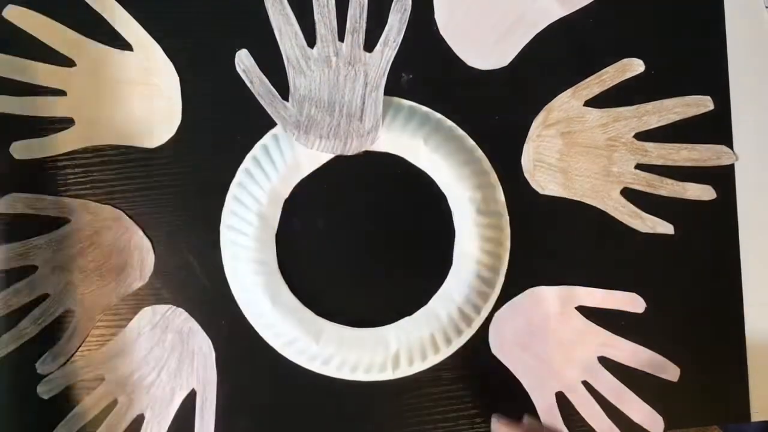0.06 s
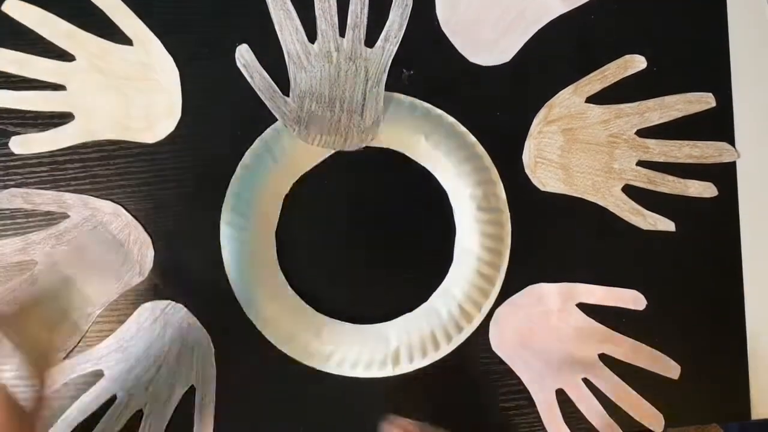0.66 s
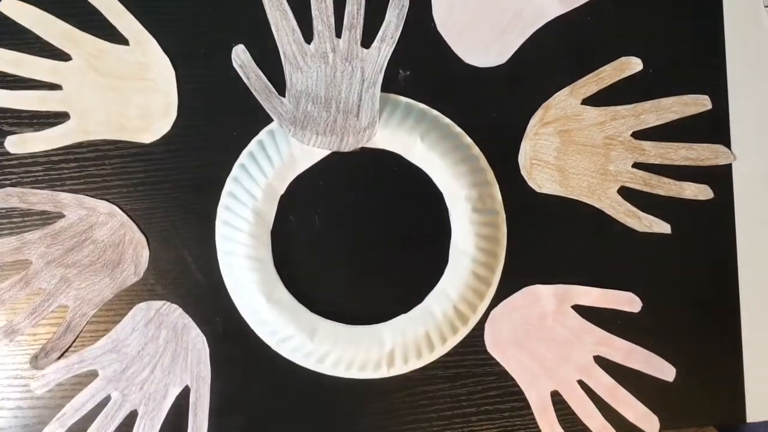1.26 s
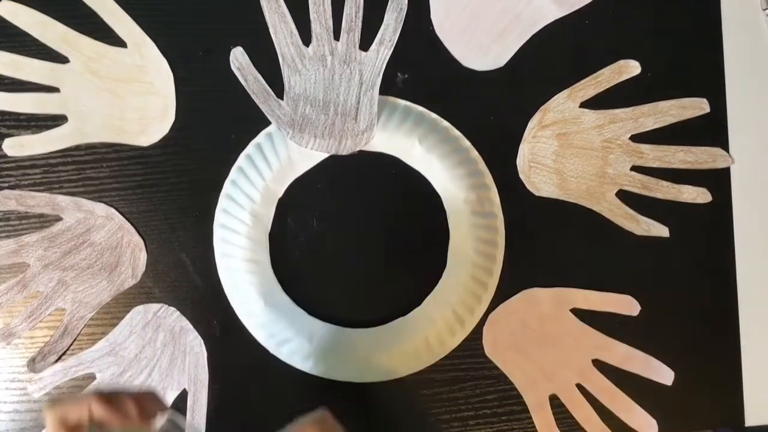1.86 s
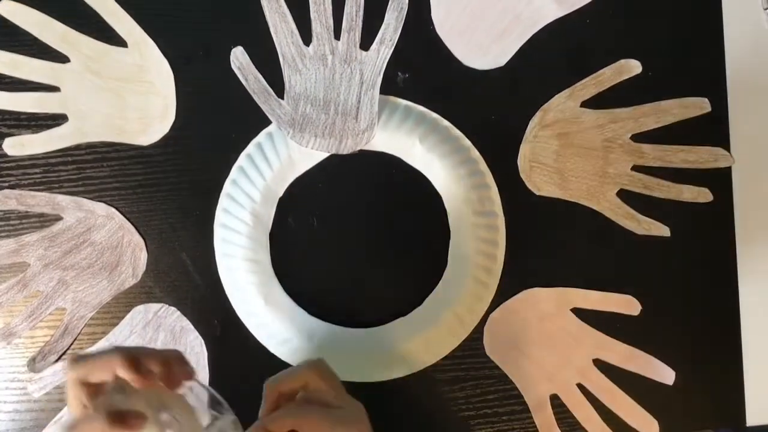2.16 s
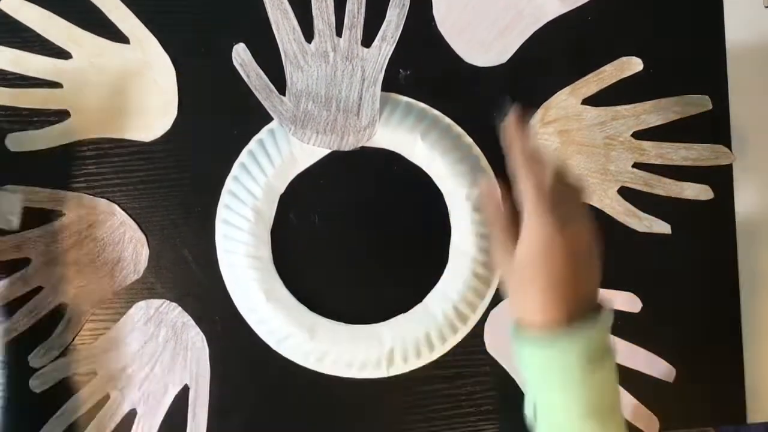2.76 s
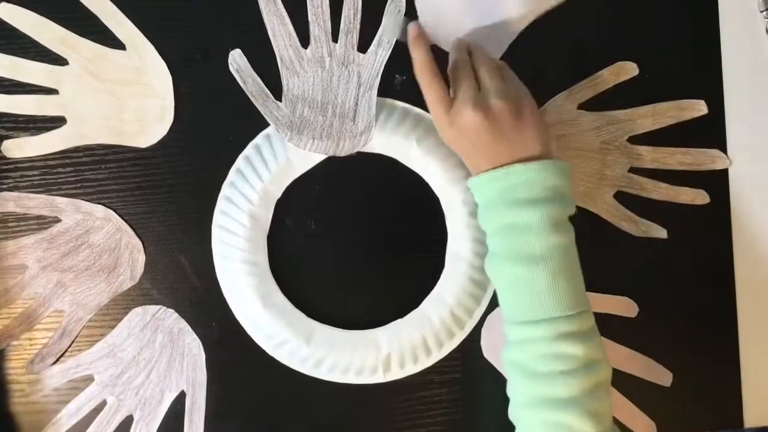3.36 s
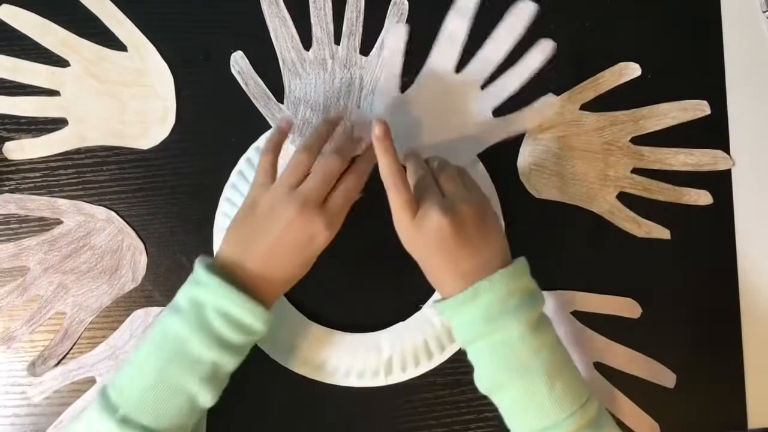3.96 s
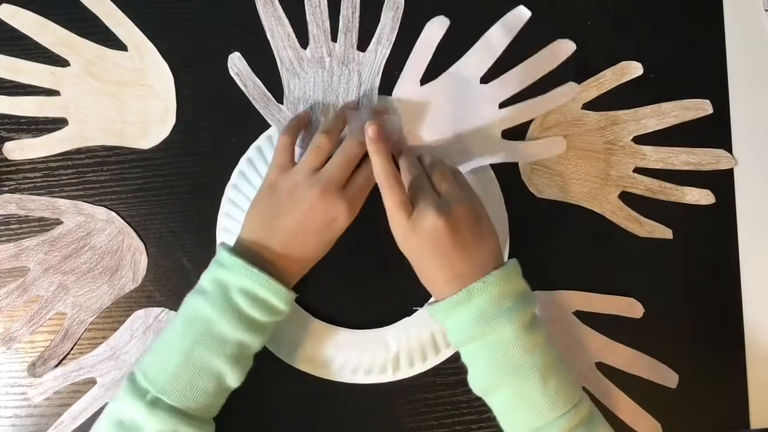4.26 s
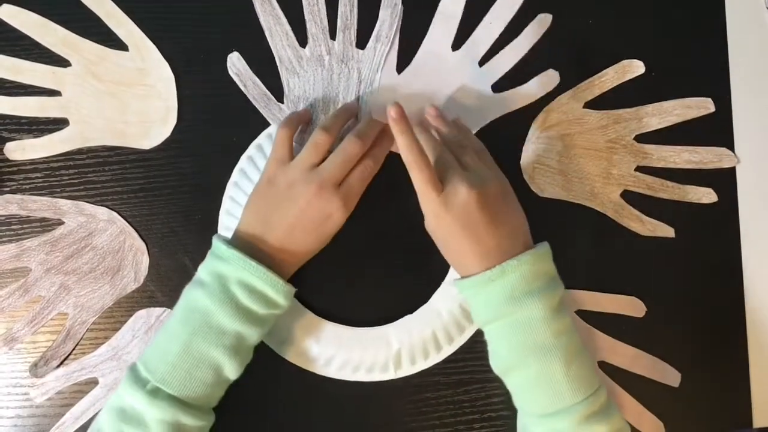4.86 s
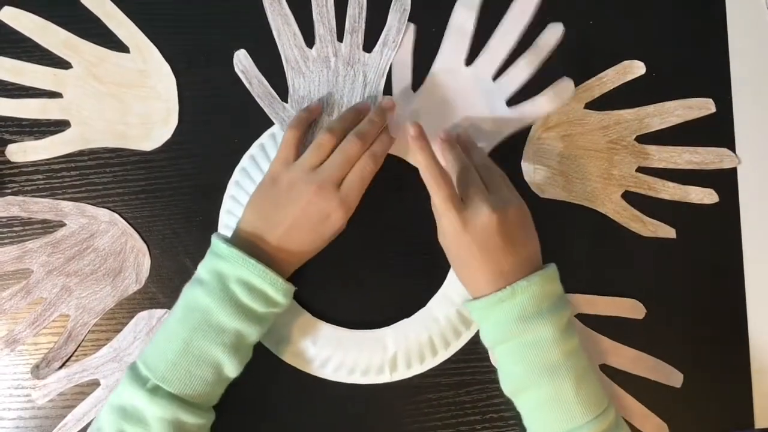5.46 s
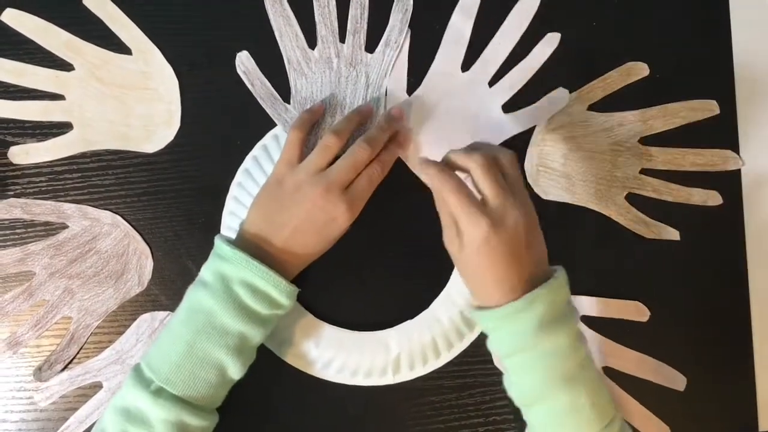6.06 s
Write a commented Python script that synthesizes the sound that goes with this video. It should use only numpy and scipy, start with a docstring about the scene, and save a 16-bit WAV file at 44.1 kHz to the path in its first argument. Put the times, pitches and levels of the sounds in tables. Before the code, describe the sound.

Paper crafting is heard from just above a wooden table in a small quiet room, over a faint rumble and hiss. From about 0.2 seconds, fingers click lightly on a plastic tape dispenser and tape peels in brief, fine crackles. Two quick snaps come at 1.3 seconds, and a sharper, louder one at 2.1 seconds as tape breaks off, followed by more small plastic clicks. From 2.7 to 3.1 seconds the dispenser knocks down on the wood and drags with a low judder, ending in another knock. At 3.2 seconds a paper cutout slides with a whisper onto a paper plate. From 3.7 seconds until about 6, fingers rub the tape flat in short, soft, hissing strokes, with paper edges flicking the plate, most clearly near 3.9, 4.5 and 5.9 seconds.

```python
"""Paper crafting on a wooden table in a small quiet room, heard from just above. Over a faint rumble and hiss,
fingers click on a plastic tape dispenser; tape peels with a fine crackle and snaps off on the teeth. From 2.7 s
the dispenser is knocked down and dragged, juddering on the wood. At 3.2 s a paper cutout slides over the table,
its fibres catching and slipping. From 3.7 s fingers rub the tape flat, and paper edges flick a paper plate."""
import sys
import numpy as np
from scipy import signal
from scipy.fft import rfft, irfft
from scipy.io import wavfile
from scipy.ndimage import uniform_filter1d

SR = 44100
rng = np.random.default_rng(int(sys.argv[2]) if len(sys.argv) > 2 else 0)


def output_pcm(signal):
    """Save a mono or channel-first signal as 16-bit PCM at the path in sys.argv[1].

    Samples are clipped to [-1, 1] before scaling.
    """
    pcm = np.clip(np.atleast_2d(signal).T, -1, 1) * 32767
    wavfile.write(sys.argv[1], SR, np.round(pcm).astype(np.int16))


N = 269892
TIME = np.arange(N) / SR


def amp(db):
    """Decibels to gain."""
    return 10 ** (np.asarray(db) / 20)


def unit(x):
    """Scale to rms 1."""
    return x / np.sqrt(np.mean(x ** 2))


def band(x, edges_hz):
    """Causal band-pass."""
    return signal.sosfilt(signal.butter(4, edges_hz, "bandpass", fs=SR, output="sos"), x)


def colour(x, spectrum):
    """Filter by a curve of (freq_hz, gain_db) points."""
    hz, db = np.transpose(spectrum)
    bins_hz = np.maximum(np.fft.rfftfreq(len(x), 1 / SR), 1)
    return irfft(rfft(x) * amp(np.interp(np.log(bins_hz), np.log(hz), db)), len(x))


def resonate(x, modes):
    """Parallel resonances, each (freq_hz, width_hz, gain_db)."""
    return sum(amp(db) * signal.lfilter(*signal.iirpeak(hz, hz / width_hz, SR), x)
               for hz, width_hz, db in modes)


def fade(t, t60_s):
    """Exponential decay, 60 dB in t60_s."""
    return np.exp(-np.log(1000) * t / t60_s)


def walk(rate_hz):
    """Smooth random wander, rms 1."""
    knots = rng.standard_normal(4096)
    return unit(np.interp(TIME * rate_hz, np.arange(len(knots)), knots))


def follow(curve):
    """Gain along (time_s, level_db) points, easing to silence outside them."""
    times_s, db = np.transpose(curve)
    gain = amp(np.interp(TIME, times_s, db)) * (TIME >= times_s[0]) * (TIME <= times_s[-1])
    return uniform_filter1d(gain, size=256)


def add(out, start_s, sound):
    """Mix a sound in at start_s."""
    start = int(start_s * SR)
    out[start:start + len(sound)] += sound[:N - start]


def slips(rate_hz, spread_db):
    """Random stick-slip impulses of uneven size."""
    happens = rng.random(N) < rate_hz / SR
    signs = rng.choice([-1, 1], N)
    sizes = amp(spread_db * np.clip(rng.standard_normal(N), -3, 3))
    return unit(happens * signs * sizes)


def flexing(x, modes, swell_db, rate_hz):
    """A bent, gripped body: each resonance swells and sinks on its own."""
    return unit(sum(amp(swell_db * walk(rate_hz)) * resonate(x, [mode]) for mode in modes))


# bass, mid, treble, air: centre_hz
BAND_CENTRES_HZ = [300, 1400, 3300, 9700]
# bass, mid, air: gain_db_per_hardness_step
HARDNESS_TILT = [-2.5, -0.84, 1.5]

def contacts(hits, voicing_db, lift_db, contact_s, softening):
    """Rows for blows(): hard contacts are short and bright, soft ones longer and duller."""
    rows, lift_width_octaves = [], .55
    for start_s, level_db, hardness, ring_hz in hits:
        near_ring = np.exp(-(np.log2(ring_hz / np.array(BAND_CENTRES_HZ)) / lift_width_octaves) ** 2)
        tilt_db = np.insert(voicing_db + hardness * np.array(HARDNESS_TILT), 2, 0)
        bass, mid, treble, air = lift_db * near_ring + tilt_db
        length_s = contact_s * np.exp(-softening * hardness)
        rows.append((start_s, level_db + treble, bass - treble, mid - treble, air - treble,
                     ring_hz, length_s))
    return rows


# bass, mid, treble, air: low_hz, high_hz
BANDS = [(80, 750), (750, 2000), (2000, 5500), (5500, 17000)]

def blows(events, spectrum, modes, modes_db, ring_db, ring_t60_1khz_s, shiver_db, shiver_t60_s,
          attack_s):
    """Impacts: a brief rattle, body modes, a shiver of many weak modes, the struck spot's ring."""
    out, t = np.zeros(N), np.arange(SR // 5) / SR
    hz, width_hz, db = np.transpose(modes)[:, :, None]
    # low modes build up more slowly
    mode_envelopes = amp(db) * np.exp(-np.pi * width_hz * t) * (1 - np.exp(-t * hz / 2))
    for start_s, level_db, bass_db, mid_db, air_db, ring_hz, contact_s in events:
        rattle = unit(colour(rng.standard_normal(len(t)), spectrum))
        rattle *= np.exp(-(t / contact_s) ** 2) + amp(shiver_db) * fade(t, shiver_t60_s)
        body = np.sum(mode_envelopes * np.sin(2 * np.pi * (hz * t + rng.random(hz.shape))), axis=0)
        ring_t60_s = ring_t60_1khz_s * np.sqrt(1000 / ring_hz)
        spot = np.sin(2 * np.pi * ring_hz * t) * fade(t, ring_t60_s) * (1 - np.exp(-t * ring_hz / 2))
        hit = (rattle + amp(modes_db) * body + amp(ring_db) * spot) * (1 - np.exp(-t / attack_s))
        for edges_hz, band_db in zip(BANDS, [bass_db, mid_db, 0, air_db]):
            part = band(hit, edges_hz)
            peak_rms = np.sqrt(uniform_filter1d(part ** 2, size=300, mode="constant").max())
            add(out, start_s, part / peak_rms * amp(level_db + band_db))
    return out


# friction bands: low_hz, high_hz
RUB_BANDS = [(400, 2500), (2500, 7000), (7000, 17000)]

def friction(strokes, grain, trims_db, ring_db, ring_width_ratio, attack_share, release_s):
    """Each stroke takes hold, swells or sags, and lets go, ringing the spot it touches."""
    gains, spots = np.zeros((3, N)), np.zeros(N)
    for start_s, length_s, level_db, swell_db, bright_db, ring_hz in strokes:
        piece = grain[int(start_s * SR):int((start_s + length_s + 10 * release_s) * SR)]
        t = np.arange(len(piece)) / SR
        progress = np.minimum(t / length_s, 1)
        attack = np.minimum(progress / attack_share, 1)
        release = np.exp(-np.maximum(t - length_s, 0) / release_s)
        envelope = amp(level_db + swell_db * (progress - .5)) * attack * release
        for gain, tilt_db in zip(gains, [-bright_db, 0, bright_db]):
            add(gain, start_s, envelope * amp(tilt_db))
        spot = unit(resonate(piece, [(ring_hz, ring_hz * ring_width_ratio, 0)]))
        add(spots, start_s, envelope * amp(ring_db) * spot)
    return spots + sum(unit(band(grain, edges_hz)) * gain * amp(db)
                       for edges_hz, gain, db in zip(RUB_BANDS, gains, trims_db))


# background spectrum: freq_hz, gain_db
ROOM_SPECTRUM = [(15, -61.5), (25, -39), (61, -4.5), (80, -1), (108, -4), (175, -6.5), (301, -10.5),
                 (463, -13), (503, -12.5), (591, -12.5), (887, -22.5), (1130, -22.5), (9840, -30.5),
                 (13200, -34.5), (16000, -37)]

def room_tone():
    """A low wavering rumble under faint hiss."""
    air = unit(colour(rng.standard_normal(N), ROOM_SPECTRUM))
    waver = .15 * walk(rate_hz=6) * band(air, (50, 600))
    return amp(-68.5) * (air + waver)


# shell contact spectrum: freq_hz, gain_db
PLASTIC_SPECTRUM = [(100, -44.5), (300, -14), (450, -10), (700, -9), (1200, -4.5), (2300, -4.5),
                    (3800, -3.5), (4700, -7), (7000, -6), (8700, -2.5), (13000, -6.5), (16000, -10.5)]
# shell resonances: freq_hz, width_hz, gain_db
PLASTIC_MODES = [(1990, 88, -10), (2380, 23, -4.5), (3430, 24, -2.0), (3885, 21, 1.5), (4700, 210, -3.5),
                 (5920, 33, -17.5), (7200, 39, -14.5), (8750, 39, -8), (9200, 36, -12.5), (10800, 20, -0.5),
                 (839, 94, 2), (1357, 40, 3.5)]
# fingers and loose parts on the shell: start_s, level_db, hardness_steps, ring_hz
CLICKS = [(0.238, -70, -7.5, 1000), (0.247, -63, 2, 900), (0.323, -59, 0, 1750),
          (0.3365, -46.5, -0.5, 1374), (0.504, -68, -3, 1470), (0.573, -67.5, -3, 1180),
          (0.698, -62.5, 0.8, 840), (0.725, -67.5, -2, 1204), (1.0137, -63, 2.5, 1990),
          (1.07, -57.5, 0.5, 770), (1.267, -57, 6, 3400), (1.2853, -54, 3.5, 3060),
          (1.388, -53.5, -1, 1910), (1.411, -61, -3.5, 1220), (1.713, -70, -2.5, 857),
          (1.735, -67.5, -2.5, 1205), (1.986, -71, -4, 738), (2.029, -80, -2.5, 1000),
          (2.0623, -56.5, 7, 1130), (2.133, -49, 1.8, 2700), (2.197, -59.5, -3, 1056),
          (2.252, -58.5, 0.5, 2140), (2.3043, -45, -0.2, 1627), (2.341, -58, -2.5, 2630),
          (2.355, -70, -3.5, 753), (2.369, -56.5, 1.5, 4470), (2.3825, -58, 8.5, 870),
          (2.4285, -69, -3.5, 1570)]
# tape parting: start_s, level_db, bass_rel_db, mid_rel_db, air_rel_db, ring_hz, rebound_s
SNAPS = [(1.304, -39, -30, 0.5, 4.5, 1202, 0.0059), (1.328, -38.5, -16.5, 0, 5, 999, .0075),
         (2.0862, -27.5, -19, -8.5, .5, 2380, .0043)]

def dispenser():
    """The plastic shell clicks; each snap strikes twice, as tape parts and the shell springs back."""
    clicks = contacts(CLICKS, voicing_db=[-6, -2.5, -6], lift_db=5.5, contact_s=.007, softening=.12)
    snap_contact_s, rebound_db = .0046, -1
    snaps = [(start_s + lag_s, level_db + step_db, *tone, snap_contact_s)
             for start_s, level_db, *tone, rebound_s in SNAPS
             for lag_s, step_db in [(0, 0), (rebound_s, rebound_db)]]
    return blows(clicks + snaps, PLASTIC_SPECTRUM, PLASTIC_MODES, modes_db=-20, ring_db=-5,
                 ring_t60_1khz_s=.069, shiver_db=-8, shiver_t60_s=.12, attack_s=.0003)


# tape peels and finger scuffs: start_s, length_s, level_db, swell_db, bright_db, ring_hz
PEELS = [(0.25, .011, -61.5, 0, 5.5, 3550), (0.455, 0.064, -75, -12, -0.5, 1400),
         (0.673, 0.066, -74.5, 1, 0.5, 1330), (1.175, 0.11, -72, 11, -1, 2100),
         (1.38, .055, -56, -4.5, 4.5, 4940), (1.445, 0.068, -70.5, -5, 5, 5040)]

def tape_peel():
    """Adhesive lets go in a fine crackle that the shell colours."""
    crackle = slips(rate_hz=9000, spread_db=5.5) * amp(2 * walk(rate_hz=120))
    shell = flexing(crackle, PLASTIC_MODES, swell_db=3, rate_hz=55)
    grain = unit(colour(crackle, PLASTIC_SPECTRUM)) + .5 * shell
    return friction(PEELS, grain, trims_db=[2.5, -1.5, -6], ring_db=-3.5, ring_width_ratio=.12,
                    attack_share=.23, release_s=.011)


# wood contact spectrum: freq_hz, gain_db
TABLE_SPECTRUM = [(50, -19), (110, 11.5), (550, 4), (1400, -0.5), (3200, -2.5), (6000, -16.5), (16000, -33)]
# table top resonances: freq_hz, width_hz, gain_db
TABLE_MODES = [(137, 14, -10), (329.5, 33, 4), (536, 36, -2), (760, 51, -17), (1026, 78, 8), (1373, 81, 11),
               (2040, 65, -28), (2718, 46, -4), (3313, 98, 2.5), (4690, 115, -6)]
# dispenser and hand on the table: start_s, level_db, hardness_steps, ring_hz
KNOCKS = [(2.7312, -38.5, 1.16, 119), (2.868, -40.5, -0.8, 557), (2.974, -50, -1.3, 143.6),
          (3.0695, -66, 6, 333), (3.118, -61.5, 3.5, 2570), (3.1365, -38, -0.23, 1287)]

def table_knocks():
    """The wooden top thuds and rings briefly under each knock."""
    knocks = contacts(KNOCKS, voicing_db=[2.5, 2, -6.5], lift_db=4, contact_s=.0066, softening=.038)
    return blows(knocks, TABLE_SPECTRUM, TABLE_MODES, modes_db=.5, ring_db=9.5,
                 ring_t60_1khz_s=.055, shiver_db=-5.5, shiver_t60_s=.12, attack_s=.0016)


# drag envelope: time_s, level_db
DRAG = [(2.763, -33), (2.783, -38), (2.857, -40), (2.881, -38), (2.929, -46.5), (2.993, -38.5),
        (3.031, -59), (3.12, -50.5)]

def dispenser_drag():
    """The dispenser sticks and slips over the wood, which groans and scrapes."""
    judder = slips(rate_hz=1500, spread_db=2)
    groan_modes = [(322, 28, -5.5), (221, 46, -7), (132, 24, -4.5), (598, 41, -15)]
    scrape_spectrum = [(60, -32), (130, -34), (300, 10.5), (430, -17), (600, 0), (900, -10),
                       (5000, -19.5), (15000, -35)]
    groan = unit(resonate(judder, groan_modes))
    scrape = unit(colour(judder, scrape_spectrum))
    return follow(DRAG) * (amp(-11) * groan + amp(-16) * scrape)


def paper_fibres():
    """Fibres catch and slip by the thousand."""
    return slips(rate_hz=14000, spread_db=1.5) * amp(1.6 * walk(rate_hz=70))


# sliding sheet spectrum: freq_hz, gain_db
GLIDE_SPECTRUM = [(300, -20), (1500, -16.5), (2400, -10.5), (2700, -1.5), (4200, -5.5), (6000, -4.5),
                  (8500, -9.5), (16000, -20)]
# glide envelope: time_s, level_db
GLIDE = [(3.22, -65), (3.3, -59.5), (3.44, -58.5), (3.494, -52.5), (3.538, -61), (3.716, -68.5),
         (3.74, -68)]

def cutout_glide(fibres):
    """A loose sheet only whispers as it slides."""
    return amp(-2.4) * unit(colour(fibres, GLIDE_SPECTRUM)) * follow(GLIDE)


# paper contact spectrum: freq_hz, gain_db
PAPER_SPECTRUM = [(180, -50), (330, 7.5), (600, 0), (1300, -3.5), (2100, -2), (3200, 3.5), (4400, 1),
                  (5600, 1.5), (6800, -7), (8300, -1.5), (11000, -3.5), (16000, -11)]
# resonances of paper on the plate: freq_hz, width_hz, gain_db
PLATE_MODES = [(650, 93, -3), (945, 59, -3.5), (1470, 480, 1), (2463, 53, 2), (3195, 310, -2),
               (5470, 180, -3), (6090, 89, 1), (7940, 1360, -5.5)]
# finger strokes: start_s, length_s, level_db, swell_db, bright_db, ring_hz
RUBS = [(3.735, .095, -64, -1, 2, 7350), (3.825, 0.097, -63.5, -1.5, -1, 3190),
        (3.95, 0.25, -72, -10, -4, 2360), (4.248, 0.1, -66.5, -10, -2.5, 2500),
        (4.35, 0.16, -61.5, 22.5, 0, 5600), (4.532, 0.02, -51, -3.5, 0.5, 5420),
        (4.618, 0.056, -62.5, -10, -1, 8000), (4.675, 0.083, -68, 7, -5, 2410),
        (4.818, 0.15, -64, -5, 0.5, 5850), (5.003, 0.12, -65, 6, 0, 7950),
        (5.13, 0.2, -66.5, 15.5, 0.5, 4900), (5.325, 0.13, -64, 5.5, 1, 4700),
        (5.465, 0.21, -68.5, -14, -0.5, 8040), (5.9, 0.13, -74, -2.5, -5.5, 1100)]

def finger_rubs(fibres):
    """Paper pressed and rubbed flat hisses and rings the plate."""
    plate = flexing(fibres, PLATE_MODES, swell_db=4, rate_hz=14)
    grain = unit(colour(fibres, PAPER_SPECTRUM)) + .6 * plate
    return friction(RUBS, grain, trims_db=[-2.5, -1.5, -5.5], ring_db=-8.5, ring_width_ratio=.035,
                    attack_share=.19, release_s=.011)


# paper edges on the plate: start_s, level_db, hardness_steps, ring_hz
FLICKS = [(3.9325, -49.5, -1, 2120), (4.304, -60, 0, 3430), (4.541, -55.5, 2.5, 5720),
          (4.627, -66, -1.8, 910), (5.657, -67.5, 0, 6080), (5.746, -69.5, 4, 720), (5.86, -52, 3.2, 5720)]

def edge_flicks():
    """A caught paper edge springs free and strikes the plate."""
    flicks = contacts(FLICKS, voicing_db=[-8, -5.5, -6.5], lift_db=4.5, contact_s=.0078, softening=.027)
    return blows(flicks, PAPER_SPECTRUM, PLATE_MODES, modes_db=-7.5, ring_db=-4,
                 ring_t60_1khz_s=.044, shiver_db=-18, shiver_t60_s=.074, attack_s=.0011)


def room(x, wet_db, low_t60_s, high_t60_s, onset_s):
    """Close walls add a short dense tail whose treble dies first."""
    t = np.arange(SR // 2) / SR
    noise = rng.standard_normal(len(t))
    t60s = np.geomspace(low_t60_s, high_t60_s, len(BANDS))
    tail = sum(band(noise, edges_hz) * fade(t, t60_s) for edges_hz, t60_s in zip(BANDS, t60s))
    tail *= 1 - np.exp(-(t / onset_s) ** 2)
    return x + amp(wet_db) * signal.fftconvolve(x, tail / np.linalg.norm(tail))[:N]


def scene():
    """All the handling in one small room, mono."""
    plastic = room(dispenser() + tape_peel(), wet_db=-13, low_t60_s=.33, high_t60_s=.18, onset_s=.003)
    wood = table_knocks() + dispenser_drag()
    fibres = paper_fibres()
    paper = cutout_glide(fibres) + finger_rubs(fibres) + edge_flicks()
    tabletop = room(wood + paper, wet_db=-10.5, low_t60_s=.26, high_t60_s=.13, onset_s=.0058)
    return (plastic + tabletop + room_tone())[None]


def record(dry):
    """The microphone sheds the deep bass and cuts the top."""
    low_hz, top_hz = 45, 15800
    thin = signal.sosfilt(signal.butter(2, low_hz, "highpass", fs=SR, output="sos"), dry)
    return signal.sosfilt(signal.ellip(8, .2, 70, top_hz, fs=SR, output="sos"), thin)


dry = scene()
out = record(dry)
output_pcm(out)
```